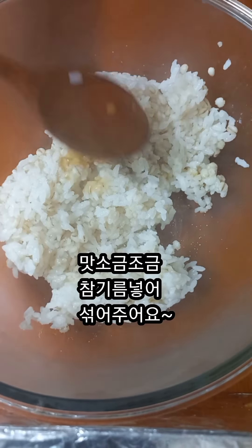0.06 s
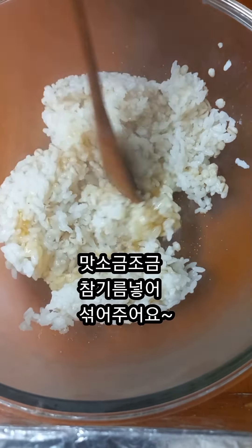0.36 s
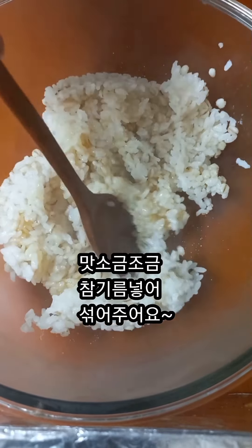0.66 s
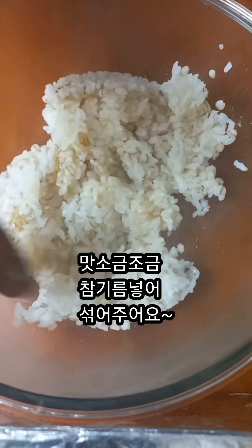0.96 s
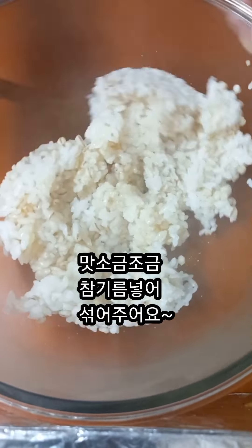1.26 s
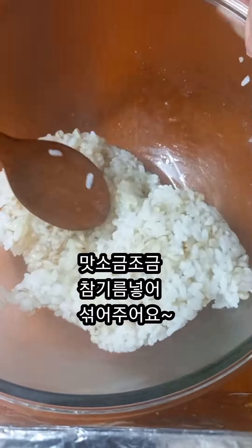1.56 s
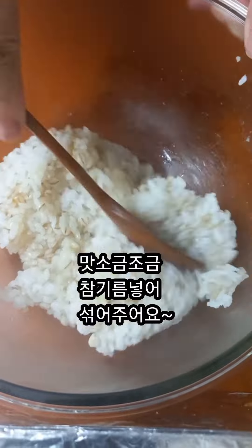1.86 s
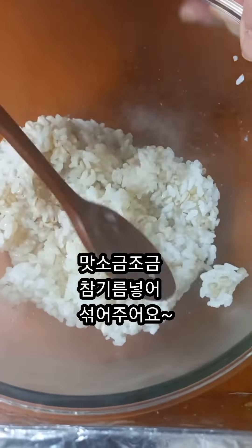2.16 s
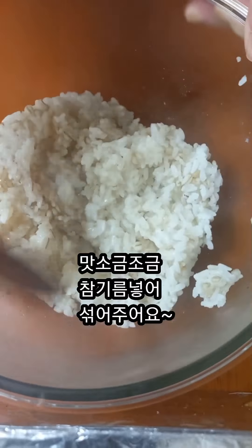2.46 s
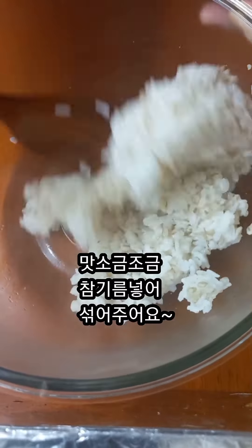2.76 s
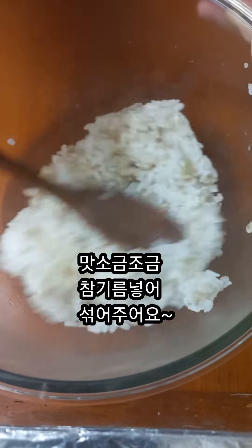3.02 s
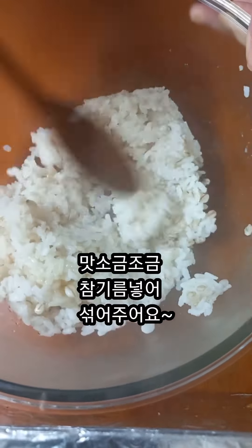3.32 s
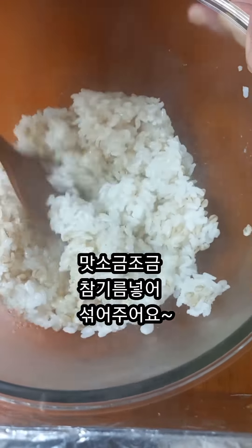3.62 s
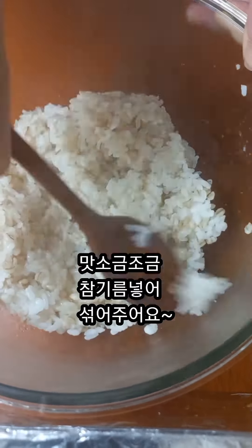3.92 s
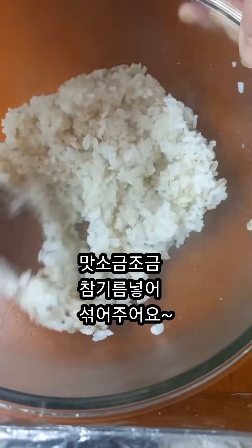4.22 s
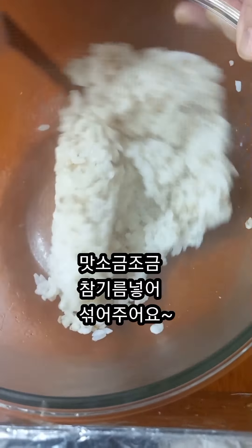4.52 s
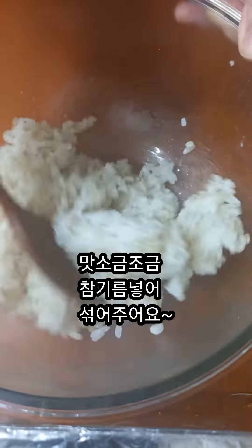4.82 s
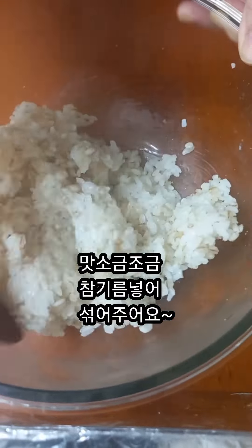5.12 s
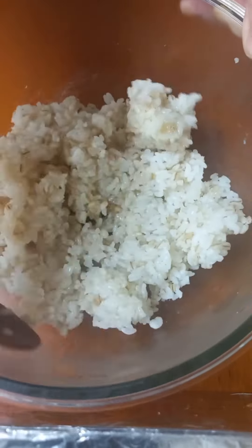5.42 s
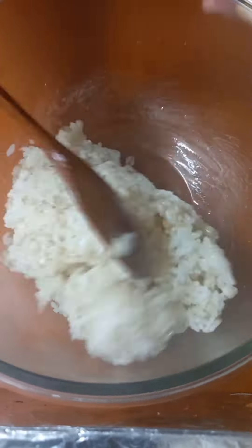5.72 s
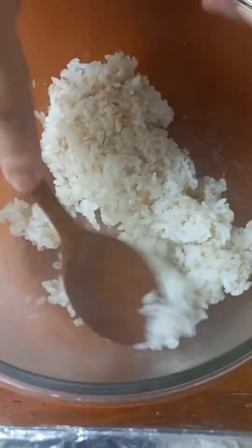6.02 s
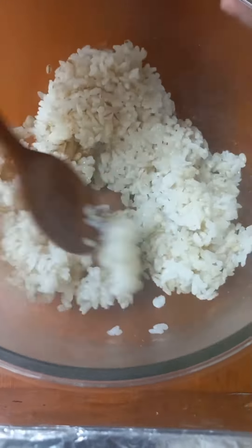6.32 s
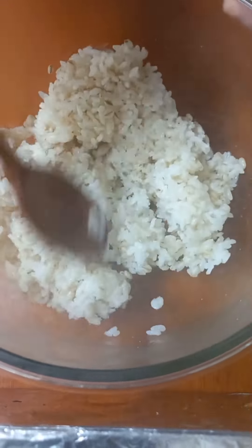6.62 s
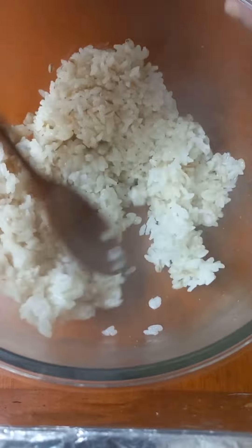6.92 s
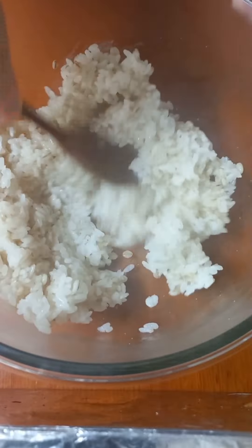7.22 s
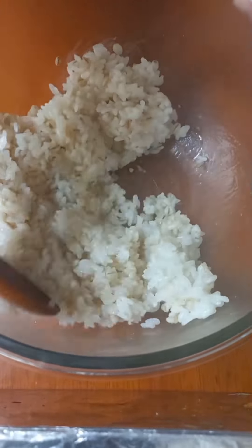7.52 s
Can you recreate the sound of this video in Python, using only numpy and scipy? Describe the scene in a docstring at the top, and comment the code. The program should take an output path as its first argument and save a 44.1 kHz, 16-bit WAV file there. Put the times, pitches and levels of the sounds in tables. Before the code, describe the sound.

Heard close up in a quiet kitchen, sticky rice squishes and crackles faintly under the uneven strokes of a wooden spoon. The glass bowl thumps twice on the wooden table early on, the loudest sounds. The spoon then clicks against the glass now and then while air pockets squelch in the rice. A further thump and a clack come just past halfway, followed by more taps and moist folding.

```python
"""A wooden spoon folds sticky, oiled rice in a glass bowl on a wooden table; small, quiet kitchen,
stereo microphones close up. From the first strokes the rice squishes and its starchy threads snap.
About half a second in, two firm pushes knock the bowl on the table; then the spoon taps the glass
and air pockets squelch through softer folding. Another firm knock comes near 4.4 s, more taps follow,
and the rice gives its loudest squish near 6.7 s, shortly before the last strokes."""
import sys
import numpy as np
from scipy import signal
from scipy.fft import rfft, irfft, next_fast_len
from scipy.io import wavfile
from scipy.ndimage import uniform_filter1d, map_coordinates

SR = 44100
rng = np.random.default_rng(int(sys.argv[2]) if len(sys.argv) > 2 else 0)


def unload_audio(sound):
    """Save the sound as a 16-bit wav file, at the path given as the first command line argument."""
    columns = np.transpose(np.atleast_2d(sound))
    # keep every value between -1 and 1, then stretch to whole-number steps
    steps = np.round(np.clip(columns, -1, 1) * 32767)
    wavfile.write(sys.argv[1], SR, steps.astype(np.int16))


N = 333837
T = np.arange(SR // 3) / SR  # time within one short event [s]


def amp(db):
    """Decibels to gain."""
    return 10 ** (np.asarray(db) / 20)


def unit(x):
    """x at rms 1."""
    return x / np.sqrt(np.mean(x ** 2) + 1e-20)


def burst(x):
    """x scaled to the energy of 20 ms at rms 1."""
    return x / np.sqrt(np.mean(np.sum(x ** 2, axis=-1)) / (.02 * SR) + 1e-20)


def along(points, hz):
    """(Hz, value) points read on a log frequency axis."""
    freqs, values = np.transpose(points)
    return np.interp(np.log(hz + 1), np.log(freqs), values)


def wobble(rate, size):
    """A smooth random curve, rate knots a second."""
    knots = rng.standard_normal(int(size * rate / SR) + 4)
    return map_coordinates(knots, [np.arange(size) * rate / SR])


def filtered(x, response):
    """x through a frequency response."""
    n = x.shape[-1]
    padded = next_fast_len(n + 4096)
    return irfft(rfft(x, padded) * response(np.fft.rfftfreq(padded, 1 / SR)), padded)[..., :n]


def coloured(x, spectrum):
    """x shaped by a spectrum, at rms 1."""
    return unit(filtered(x, lambda hz: amp(along(spectrum, hz))))


def resonant(x, centre, q):
    """x through one resonance, at rms 1."""
    width = centre / q
    return unit(filtered(x, lambda f: 1j * f * width / (centre ** 2 - f ** 2 + 1j * f * width)))


def patchy(x, depth_db):
    """x through resonances that come and go at random."""
    bins = signal.stft(x, nperseg=512)[2]
    field = uniform_filter1d(rng.standard_normal(bins.shape[1:]), size=7, axis=0)
    field = uniform_filter1d(field, size=9, axis=1)
    return signal.istft(bins * amp(depth_db * unit(field)), nperseg=512)[1][:, :N]


def noise(size, side):
    """White noise at two microphones; side is the unshared part."""
    a, b = rng.standard_normal((2, size))
    return unit(np.array([a + side * b, a - side * b]))


def grains(size, rate, spread_db, side):
    """Tiny pops at random times, most of them small, each from its own direction."""
    pops = (rng.random(size) < rate / SR) * amp(spread_db * np.minimum(rng.standard_normal(size), 2))
    return unit(pops * noise(size, side))


def fade(t60, hold=0):
    """An envelope that holds, then dies."""
    return amp(-60 * np.maximum(T - hold, 0) / t60)


def panned(x, pan_db):
    """x leaning to the left microphone by pan_db."""
    return x * amp(np.array([[pan_db], [-pan_db]]) / 2)


def add(track, s, x):
    """Mix x into the track at s seconds."""
    part = track[:, max(round(s * SR), 0):][:, :x.shape[-1]]
    part += x[:, :part.shape[1]]


def ringing(modes, hold, apart):
    """Damped modes of unsteady phase; neighbours reach the two microphones in opposite order."""
    out = np.zeros((2, len(T)))
    for k, (hz, db, t60) in enumerate(modes):
        drift = .3 * (hz / 300) ** .4 * wobble(60, len(T))
        phase = 2 * np.pi * (hz * T + rng.random()) + drift
        lead = (-1) ** k * apart * min(hz / 400, 1.5) ** 0.5
        out += amp(db) * fade(t60, hold) * np.sin(phase + np.array([[lead], [-lead]]))
    return out


def room_tone():
    """The low, steady hush of the kitchen behind the bowl."""
    # spectrum of the hush: (frequency [Hz], level [dB])
    hush_spectrum = [(25, -11.5), (110, -5), (270, 2), (400, -11.5), (1000, -18), (2700, -25.5),
                     (6000, -26), (16000, -24)]
    return amp(-73) * coloured(noise(N, side=.7), hush_spectrum)


def kitchen(x):
    """The small room answers 5 ms later with a short tail, different at each microphone."""
    # reverberation time: (frequency [Hz], t60 [s])
    decay_times = [(100, 0.45), (1000, 0.12), (5000, 0.1525), (15000, 0.053)]
    hz, t, bins = signal.stft(rng.standard_normal((2, SR // 2)), SR, nperseg=256)
    decay = amp(-60 * t / along(decay_times, hz)[:, None])
    tail = signal.istft(bins * decay, SR, nperseg=256)[1]
    tail = np.pad(tail / np.linalg.norm(tail[0]), ((0, 0), (SR // 200, 0)))
    return signal.fftconvolve(x, tail, axes=1)[:, :N]


def squelches():
    """Air sputters through a wet pocket whose resonance glides as it changes size."""
    # air pockets: (time [s], length [s], start pitch [Hz], end pitch [Hz], width [Hz], level [dB])
    pockets = [(0.053,0.074,5200,4880,704,-70.5), (1.552,0.1,2790,2945,675.4,-64),
               (1.553,0.043,5270,4620,1190,-62.5), (1.663,0.063,3254,3300,700,-64),
               (1.738,0.074,3320,3650,700,-66.5), (2.077,0.068,4450,5400,1104,-62.5),
               (2.406,0.11,3350,3500,600,-74.5), (2.753,0.1,1550,1800,500,-77),
               (2.876,0.057,3680,3500,600,-76), (3.18,.07,1596,1600,399,-74.5),
               (3.195,0.083,2950,2750,477,-65.5), (4.452,0.079,5470,5970,181,-73),
               (6.223,0.062,3896,3660,893,-67), (6.632,0.085,2610,2940,524,-57.5),
               (6.703,0.081,2930,3394,990,-61.5), (6.723,0.046,4690,4960,2370,-57.5),
               (7.183,0.082,2750,2316,1090,-63.5)]
    out = np.zeros((2, N))
    for s, length, start_hz, end_hz, width, db in pockets:
        progress = np.clip(T / length, 0, 1)
        pops = grains(len(T), rate=4400, spread_db=1.0, side=0.87)
        sputter = filtered(pops, lambda hz: 1 / np.sqrt(1 + (2 * hz / width) ** 4))
        glide = 2 * np.pi * np.cumsum(start_hz + (end_hz - start_hz) * progress) / SR
        swell = np.sqrt(np.abs(np.sin(np.pi * progress ** 0.69)))
        add(out, s, amp(db) * swell * unit(sputter * np.sin(glide)))
    return panned(out, pan_db=1.5)


def pressing(column, rest_db):
    """Level in dB of one stroke column: each stroke builds, holds and settles; their powers add."""
    # the spoon presses or turns a lump: (time [s], length [s], squish [dB], wet fizz [dB])
    strokes = [(0.212,0.054,-69.5,-70), (.44,.06,-63,-62), (.565,.14,-68,-68.5), (0.755,0.085,-67.5,-74),
               (0.88,.04,-63.5,-69), (1.0,.03,-67.5,-70.5), (1.135,0.043,-62.5,-71.5),
               (1.22,.08,-60.5,-60.5), (1.34,0.12,-65,-65), (1.53,.09,-61,-70), (1.65,.04,-59.5,-63.5),
               (1.7,.18,-66.5,-69), (2.02,.11,-64.5,-67.5), (2.169,.11,-69.5,-70.5),
               (2.356,0.077,-67,-66.5), (2.55,.035,-61.5,-66.5), (2.7,.03,-69.5,-63.5), (2.73,.08,-66,-69),
               (3.021,.28,-71.5,-72.5), (3.397,0.018,-64,-61), (3.57,.045,-67.5,-68.5),
               (3.73,.055,-65.5,-70), (3.933,0.042,-65,-68.5), (4.089,.065,-68.5,-70.5),
               (4.266,0.038,-68,-64.5), (4.418,0.036,-65,-67), (4.539,.14,-67.5,-66.5),
               (4.78,.07,-70,-68.5), (4.91,.18,-66.5,-68), (5.177,0.063,-71,-71.5), (5.265,.11,-60,-64.5),
               (5.42,0.17,-66,-68), (5.608,.11,-61,-62.5), (5.82,0.0494,-67.5,-75), (5.875,.29,-68,-69),
               (6.207,.07,-62.5,-65), (6.324,.17,-75,-72), (6.579,0.17,-61.5,-64), (6.711,0.034,-50.5,-67),
               (6.766,.16,-62,-63), (7.023,.04,-62.5,-66), (7.179,.04,-59,-64), (7.303,.18,-68,-67.5)]
    creep_db_per_s = -0.5  # the lump creeps between strokes, ever more quietly
    power = amp(rest_db + creep_db_per_s * np.arange(N) / SR) ** 2
    for stroke in strokes:
        s, length = stroke[:2]
        first = max(round(s * SR), 0)
        t = np.arange(min(SR, N - first)) / SR
        rise_s, settle_t60 = .5 * length, 0.13 + 3 * length
        build = np.sin(np.pi / 2 * np.minimum(t / rise_s, 1)) ** 2
        settle_db = -60 * np.maximum(t - length, 0) / settle_t60
        power[first:first + len(t)] += (build * amp(stroke[column] + settle_db)) ** 2
    return 10 * np.log10(power)


def rice():
    """Countless wet grains part under each stroke, a few with a crisp tick, over a low room rumble."""
    # spectra of the squish, the wet fizz and the room rumble: (frequency [Hz], level [dB])
    squish_spectrum = [(200, -18.5), (900, -18.5), (1700, -12.5), (2400, -6), (3400, 0), (5300, 2.5),
                       (6900, 1.5), (8000, -11.5), (16000, -26)]
    fizz_spectrum = [(4000, -25.5), (7500, -5.5), (9500, -1.5), (12500, 1.5), (16000, -2.5)]
    rumble_spectrum = [(25, -14), (70, -1), (140, 2), (270, -6.5), (550, -7.5), (900, -24.5), (2000, -36.5),
                       (6000, -54.5)]
    squish_db = pressing(column=2, rest_db=-83)
    fizz_db = pressing(column=3, rest_db=-85)
    rumble_db = -74.5 + 0.14 * (squish_db - squish_db.mean())  # swells slightly with the strokes
    clumps_db = 0.61 * wobble(70, N)  # the lump gives way unevenly
    mush = patchy(grains(N, rate=10000, spread_db=0.5, side=1.0), depth_db=3)
    mush = filtered(coloured(mush, squish_spectrum), lambda hz: hz ** 3 / (hz ** 3 + 1500 ** 3))
    squish = amp(squish_db + clumps_db) * mush
    prickle = patchy(grains(N, rate=9000, spread_db=0.0, side=0.83), depth_db=2)
    fizz = amp(fizz_db + clumps_db) * coloured(prickle, fizz_spectrum)
    pops = grains(N, rate=45, spread_db=4, side=.9)
    ticks = amp(fizz_db - 9) * resonant(pops, 7000, q=.7)
    rumble = amp(rumble_db + 1.5 * wobble(14, N)) * coloured(noise(N, side=0.3), rumble_spectrum)
    return panned(squish + ticks, pan_db=0.5) + fizz + rumble


def snaps():
    """A starchy thread parts: a brief creak of tiny pops, then one snap."""
    # sticky grains pull loose: (time [s], relative level [dB], centre [Hz], left over right [dB])
    threads = [(0.2304, -49, 11800, -4), (0.505, -31, 5750, 21), (0.521, -28.5, 5700, 8),
               (0.596, -29, 12900, -16), (0.8964, -45.5, 3480, 9), (1.0162, -43, 5400, 9),
               (1.0735, -38, 11000, 10), (1.1547, -35, 4860, -3), (1.234, -48, 4140, -2),
               (1.2536, -31, 3960, 8), (1.279, -21.5, 12500, -5), (1.4362, -38, 4280, 7),
               (1.48, -31, 4320, 5), (2.1288, -40.5, 6120, 4), (2.5684, -38.5, 5300, 13),
               (2.581, -33.5, 9800, 14), (3.9874, -39.5, 6310, 12.5), (4.2718, -37.5, 5450, 5.5),
               (4.3096, -45, 4440, 17), (4.7359, -44.5, 4800, 8), (4.9032, -32.5, 12300, 0.5),
               (5.7178, -32.5, 5140, 14), (6.4467, -47, 15300, 16), (7.3863, -48, 5680, 12.5)]
    out = np.zeros((2, N))
    creak_s, parting_db = .008, -2
    for s, db, hz, pan_db in threads:
        swell = amp(-26 * np.maximum(1 - T / creak_s, 0))
        decay = fade(0.01, creak_s) + .12 * fade(.06)
        creak = burst(grains(len(T), rate=8200, spread_db=4.5, side=.9) * swell * decay)
        parting = burst(noise(len(T), side=0.86) * (T >= creak_s) * fade(0.005, creak_s))
        snap = burst(resonant(creak + amp(parting_db) * parting, hz, q=2.4))
        add(out, s + 0.0013 - creak_s, panned(amp(db - 24) * snap, pan_db))
    return out


def taps():
    """Wood grinds briefly on glass: a dry crack, the spoon's clack, a bright tick, the bowl's ring."""
    # spoon on glass: (time [s], crack [dB], ring [dB], clack [dB], tick [dB], contact time [s],
    # ring length [factor], left over right [dB])
    hits = [(1.235,-51.5,-49.5,-67,-47.5,0.0028,3.7,1), (1.277,-54.5,-49.5,-85,-54,0.0021,4.8,7.5),
            (1.327,-70,-91,-75,-55,0.0031,1.3,7), (1.355,-52,-40,-49.5,-57,0.001,0.48,12),
            (3.417,-41.5,-87,-70.5,-46,0.0026,0.56,7.5), (3.783,-54.5,-60.5,-64.5,-82,0.0022,0.64,6.5),
            (4.446,-77,-44,-99,-79,.002,0.36,0), (4.560,-45,-40.5,-34.5,-45,0.0032,0.88,2),
            (5.317,-44,-43,-45,-34,0.00068,0.85,2), (5.6,-52,-53,-70,-61,0.0022,1.3,4.5),
            (5.664,-56.5,-59.5,-61,-74,0.006,2.3,2.5), (5.719,-55.5,-60.5,-86,-43.5,0.0032,0.41,3),
            (6.885,-46.5,-56,-58,-57,0.0015,0.51,3)]
    # modes of the glass, damped by the rice: (frequency [Hz], level [dB], t60 [s])
    glass_modes = [(530,-1,0.079), (643,-17.5,0.085), (1282,-23,0.18), (1376,-18,0.11), (2367,-17.5,0.15),
                   (2472,-8.5,0.055), (3672,-10,0.12), (4400,-17,0.086), (5490,-12.5,0.082),
                   (7000,-24,0.12), (9050,-29,0.098)]
    # spectra of the crack and the tick: (frequency [Hz], level [dB])
    crack_spectrum = [(200, -7), (600, 3), (900, -7), (1300, -2), (1800, -6.5), (2250, -7), (2800, -4),
                      (3600, -5.5), (5000, 0.5), (7500, -25.5), (16000, -12.5)]
    tick_spectrum = [(2500, -24), (4200, 5), (6300, 4.5), (7800, -1), (9100, 4.5), (10500, -2.5),
                     (12300, 1.5), (14000, -1), (16000, -32)]
    out = np.zeros((2, N))
    for s, crack_db, ring_db, clack_db, tick_db, touch, free, pan_db in hits:
        hard_db = 0.38 * (clack_db - ring_db)  # a square blow wakes the upper modes
        modes = [(hz, db + hard_db * (hz > 2000), t60 * free) for hz, db, t60 in glass_modes]
        ring = burst(ringing(modes, hold=0, apart=0.32) * (1 - fade(0.027)))
        wood = np.sin(2 * np.pi * 3735 * T + 0.42 * wobble(600, len(T)))
        clack = burst(wood * fade(0.012, touch) * (1 - fade(0.028)))
        # dense high modes of a bowl left free to ring
        linger = 0.27 * min(amp(ring_db - crack_db), 1) * fade(0.15)
        crack_shape = fade(.0067, touch) + .05 * fade(.1) + .45 * linger
        crack = burst(coloured(noise(len(T), side=1.0), crack_spectrum) * crack_shape)
        tick = burst(coloured(noise(len(T), side=1.0), tick_spectrum) * (fade(0.0047, touch) + linger))
        contact = amp(crack_db) * crack + amp(clack_db) * clack + amp(tick_db) * tick
        add(out, s, amp(ring_db) * ring + panned(contact, pan_db))
    return out


def knocks():
    """The bowl is shoved down, rocks briefly and sets the table top booming, with a rattling edge."""
    # bowl on table: (time [s], relative level [dB], thump centre [Hz], edge offset [dB],
    # rocking time [s], build-up [s])
    blows = [(.454,-16.5,295,-24.5,0.015,0.0018), (.594,-11.5,345,-13,0.029,0.0016),
             (.895,-53,150,-23,0.014,0.0056), (1.022,-53.5,110,-17.5,0.017,0.0021),
             (1.152,-29,159,-16,0.0062,0.0022), (1.353,-36,304.4,-15.5,0.029,0.0016),
             (2.021,-61.5,199,-20,0.016,0.0034), (2.367,-42.5,209,-20,0.0083,0.0026),
             (2.712,-52,213.3,-21.5,0.03,0.012), (3.417,-40,260,-12.5,0.012,0.00365),
             (3.782,-54,344,-18,0.019,0.0014), (4.128,-52.5,250,-23.5,0.012,0.0055),
             (4.436,-23,207,-16,0.012,0.01), (5.316,-45.5,341,-10,0.04,0.0052),
             (5.658,-50.5,246.4,-3,0.046,0.0051), (6.053,-43.5,497,-12.5,0.012,0.00095),
             (6.059,-39,92,-15.5,0.014,0.0045), (6.222,-52,177.5,-18.5,0.034,0.0079),
             (6.447,-53,193,-31,0.026,0.0075), (6.883,-40.5,256,-16.5,0.02,0.0015),
             (7.054,-47,119,-20,0.0056,0.0084)]
    # modes of bowl and table together: (frequency [Hz], level [dB], t60 [s])
    table_modes = [(40,-15,.15), (63.5,-10.5,0.073), (90.9,-11,0.25), (116,-5.5,0.17), (150.5,3.5,0.089),
                   (221.2,1,0.11), (262,-4,0.2), (301.8,2,0.038), (389.2,-3.5,0.12), (441,0.5,0.069),
                   (518.7,-1,0.13), (571.5,-5,.13), (618,-5,0.075), (675,-9.5,0.093), (839,-19.5,0.2)]
    # spectrum of the hard edge: (frequency [Hz], level [dB])
    edge_spectrum = [(300, -25.5), (650, 4), (950, -3), (1400, -10.5), (2000, -14), (3000, -25),
                     (6000, -35.5), (16000, -52.5)]
    out = np.zeros((2, N))
    for s, db, hz, edge_db, rock, build in blows:
        modes = [(f, level - 3.1 * abs(np.log2(f / hz)), t60) for f, level, t60 in table_modes]
        boom = burst(ringing(modes, hold=min(rock, .04), apart=0.59) * (1 - fade(0.02028)))
        cycles = (T - build - .0017) * hz  # the push peaks once the force has built up
        push = burst((np.sin(2 * np.pi * cycles) - .1) * np.exp(-(cycles / 0.79) ** 2))
        edge_shape = (fade(0.18, build) + 1.1 * fade(.05, build)) * (1 - fade(0.017))
        edge = burst(coloured(noise(len(T), side=1.0), edge_spectrum) * edge_shape)
        rise = np.minimum(T / build, 1)
        add(out, s, rise * (amp(db - 8.0) * boom + amp(db - 11.5) * push + amp(db + edge_db - 3) * edge))
    return out


def scene():
    """Spoon, rice and bowl close to the microphones, the kitchen faint behind them."""
    thuds = knocks()
    spoon = taps() + snaps() + squelches()
    return room_tone() + thuds + spoon + rice() + kitchen(amp(-28.0) * thuds + amp(-16.5) * spoon)


def record(dry):
    """The microphone signal is cut steeply above the band limit."""
    top_hz = 16050
    return filtered(dry, lambda hz: 1 / np.sqrt(1 + (hz / top_hz) ** 160))


dry = scene()
out = record(dry)
unload_audio(out)
```